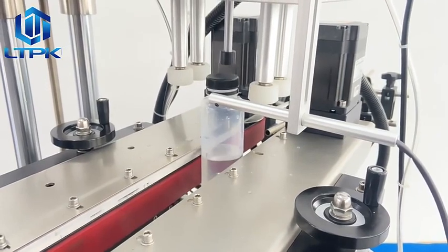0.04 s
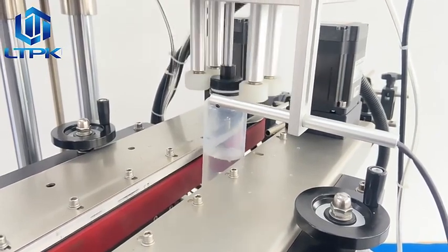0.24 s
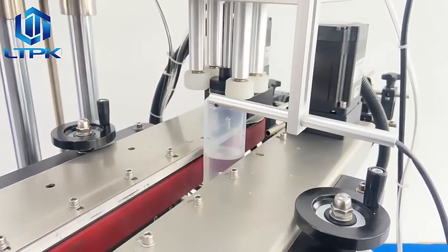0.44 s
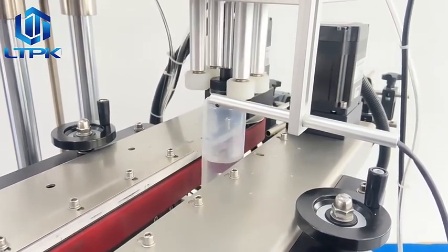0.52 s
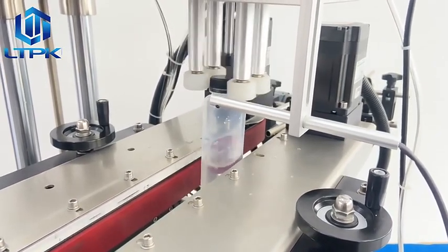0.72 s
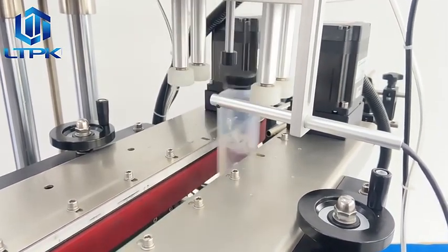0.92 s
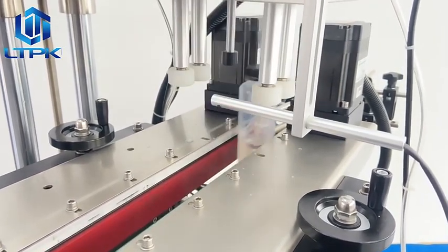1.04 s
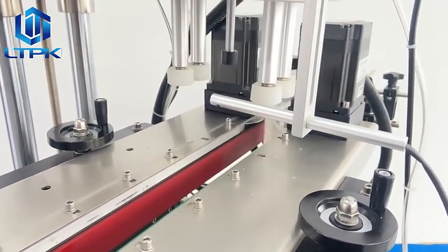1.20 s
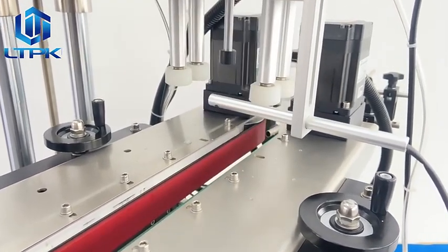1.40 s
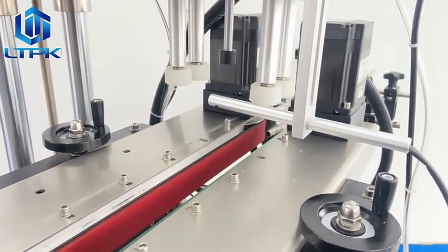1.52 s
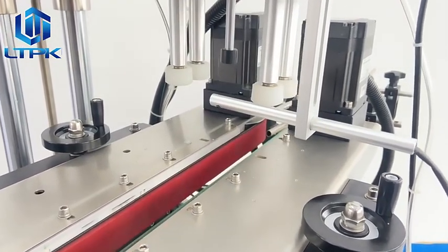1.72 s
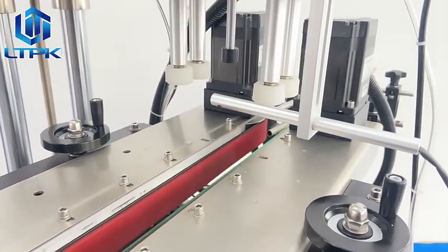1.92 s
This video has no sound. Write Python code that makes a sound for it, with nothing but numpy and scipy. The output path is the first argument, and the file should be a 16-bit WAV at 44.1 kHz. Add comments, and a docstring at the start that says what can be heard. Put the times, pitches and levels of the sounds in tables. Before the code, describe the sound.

A bottle capping machine, heard close in stereo in an echoing factory hall. Low rumble and motor hum; at 0.08 s a valve snaps, then heavy steel clanks, air hiss and frame shudder until 0.35. Spindles whir and rattle around 2.6 kHz until about 0.7. Sharp air puffs and clacks at 0.7-0.9, ringing away by 1.15. Then echo, hum, rumble and dull far knocks at 1.27-1.82, mostly left.

```python
"""Hall rumble and a steady motor hum, the rumble quieter until the machine starts. A capping head drops on
a bottle: a valve snaps, frame shudders, air puffs, metal clanks, spindles rattle and whir. Then the hall is
left: echo tail, hum, rumble and far knocks. Air, rumble and echo are shaped noise; clanks and knocks are
struck modes; spindles are filtered clicks plus a whine; frame and hum are sines."""
import sys
import numpy as np
from scipy import signal
from scipy.fft import rfft, irfft, next_fast_len
from scipy.io import wavfile
from scipy.ndimage import uniform_filter1d

SR = 44100
rng = np.random.default_rng(int(sys.argv[2]) if len(sys.argv) > 2 else 0)


def convert_level_to_amplitude(level_db):
    """Map a level in decibels to its linear amplitude factor."""
    exponent = np.asarray(level_db, float) / 20
    return 10 ** exponent


def unload_wav(signal):
    """Save mono or channel-first audio to the path in sys.argv[1] as 16-bit WAV at rate SR, clipped to [-1, 1]."""
    wavfile.write(
        sys.argv[1],
        SR,
        np.round(np.clip(np.atleast_2d(signal).T, -1, 1) * 32767).astype(np.int16),
    )


N = 85995
T = np.arange(N) / SR
PAD = next_fast_len(2 * N)
HZ = np.maximum(np.arange(PAD // 2 + 1) * SR / PAD, 1)


def over_hz(table):
    """Reads an (f/Hz, value) table at every frequency, linear in log f."""
    table = np.array(table, float)
    return np.interp(np.log(HZ), np.log(table[:, 0]), table[:, 1])


def curve(table, col=1, off_db=-120):
    """Gain over time from a dB column, off_db outside."""
    table = np.array(table, float)
    return convert_level_to_amplitude(np.interp(T, table[:, 0], table[:, col], off_db, off_db))


def shape(x, gain):
    """Filters by a gain per frequency."""
    return irfft(rfft(x, PAD) * gain, PAD)[..., :N]


def unit(x):
    """Scales to rms 1."""
    return x / np.sqrt(np.mean(x ** 2))


def band(x, lo_hz, hi_hz):
    """Scales so that one band has rms 1."""
    inside = shape(x, (HZ > lo_hz) & (HZ < hi_hz))
    return x / np.sqrt(np.mean(inside ** 2))


def peak(hz, width_hz):
    """Complex response of one resonance."""
    return 1 / (1 + 1j * (HZ ** 2 - hz ** 2) / (HZ * width_hz))


def walk(rate_hz):
    """Slow random signal, rms 1: noise averaged twice over 1 / rate_hz."""
    k = int(SR / rate_hz)
    return unit(uniform_filter1d(uniform_filter1d(rng.standard_normal(N), k), k))


def add(out, at_s, x):
    """Mixes x in at a time."""
    i = int(at_s * SR)
    out[..., i:i + x.shape[-1]] += x[..., :N - i]


def clicks(per_s, scatter_db):
    """Random clicks of very uneven size, rms 1."""
    hits = rng.random(N) < per_s / SR
    return unit(hits * rng.standard_normal(N) * convert_level_to_amplitude(scatter_db * rng.exponential(size=N)))


def tone(hz, waver_hz=0, rate_hz=15):
    """Sine of rms 1; its pitch wavers by waver_hz rms."""
    return np.sqrt(2) * np.sin(2 * np.pi * np.cumsum(hz + waver_hz * walk(rate_hz)) / SR)


def ring(modes, contact_s, near_hz=None):
    """One blow on decaying modes, each struck a little differently: soft onset, rough level, peak 1."""
    strike_scatter_db, off_pitch_db_per_octave, roughness = 2.5, 21.5, 0.3
    m, t = np.array(modes, float), T[:8000]
    chance = rng.uniform(-1, 1, (3, len(m)))
    db = m[:, 1] + strike_scatter_db * chance[0]
    hz = m[:, 0] * (1 + 0.01 * chance[1])
    if near_hz:  # modes far from the struck part's pitch ring less
        db = db - off_pitch_db_per_octave * np.abs(np.log2(hz / near_hz))
    sines = np.sin(2 * np.pi * hz[:, None] * t + np.pi * chance[2][:, None])
    decay = convert_level_to_amplitude(-60 * t / m[:, 2:])
    x = (1 - np.exp(-t / contact_s)) * (convert_level_to_amplitude(db) @ (sines * decay))
    x = x * (1 + roughness * unit(uniform_filter1d(rng.standard_normal(len(t)), size=120)))
    return x / np.abs(x).max()


# width of diffuse sound: f/Hz, side gain/dB
DIFFUSE_WIDTH = [(30, -40), (110, -13.5), (200, -11), (350, -4.5), (640, 1), (1150, 2), (2080, 4),
                 (3770, -2.5), (6800, 0.5), (12300, -19)]


def spread(mid, side):
    """Diffuse left and right from two unrelated signals, width depending on pitch."""
    side = shape(side, convert_level_to_amplitude(over_hz(DIFFUSE_WIDTH)))
    return np.array([mid + side, mid - side])


# rumble spectrum: f/Hz, relative density/dB
HALL_COLOUR = [(18, -56), (30, -30), (59, 4), (209, -6), (306, -13.5), (347, -6.5), (404, -10),
               (722, -18.5), (1360, -20), (2250, -24.5), (2800, -24), (3200, -30.5), (5000, -37.5),
               (7740, -39), (11300, -46), (13000, -50)]
# motor hum: f/Hz, rms level/dB
MOTOR_HUM = [(70.0, -43), (209.9, -56.5), (279.9, -53)]


def hall():
    """Rumble: half-octave noise bands that flicker alone; motor hum: sines of wandering level."""
    rumble_db, start_db, start_treble_db_per_decade = -34.5, -3.5, -4.5
    bass_flicker_db, treble_flicker_db = 3.4, 1.2
    before = np.interp(T, [.075, .1], [1, 0])  # quieter until the machine starts
    rumble = np.zeros((2, N))
    for hz in 32 * 2 ** np.arange(0, 8.8, .5):
        own = np.abs(np.cos(np.pi * np.clip(np.log2(HZ / hz), -.5, .5)))
        noise = shape(rng.standard_normal((2, N)), own * convert_level_to_amplitude(over_hz(HALL_COLOUR)))
        quiet_db = before * (start_db + start_treble_db_per_decade * max(np.log10(hz / 500), 0))
        flicker_db = bass_flicker_db if hz < 400 else treble_flicker_db
        rumble += noise * convert_level_to_amplitude(flicker_db * walk(13.0) + quiet_db)
    rumble = rumble / np.sqrt(np.mean(rumble[0] ** 2)) * convert_level_to_amplitude(rumble_db)
    hum = sum(convert_level_to_amplitude(db + 0.58 * walk(8.0)) * np.sqrt(2) * np.sin(2 * np.pi * hz * T) for hz, db in MOTOR_HUM)
    return spread(*rumble) + hum


# frame shudder: t/s, f/Hz, level/dB
FRAME_SHUDDER = [(0.08, 92.8, -86), (0.11, 88, -20), (0.158, 84.5, -51), (0.19, 89.8, -24.5),
                 (0.218, 92.8, -33), (0.296, 90.2, -14.5), (0.404, 89.74, -36), (0.454, 89.2, -25),
                 (0.602, 90.6, -37.5), (0.672, 83.6, -57), (0.7, 80.2, -20.5), (0.752, 82.2, -35.5),
                 (0.784, 79, -25), (0.822, 82.8, -49), (0.858, 81.5, -15), (0.902, 83.3, -20),
                 (0.934, 79.7, -17), (0.962, 72.2, -35), (1.008, 71.4, -46), (1.032, 69.3, -46),
                 (1.088, 68.6, -22), (1.136, 64.7, -28.5), (1.186, 68.8, -37.5), (1.282, 70.4, -35.5),
                 (1.336, 70.7, -43), (1.44, 72.4, -34.5), (1.5, 73.2, -35)]
# lowest sway and a panel of the frame: t/s, sway level/dB, panel level/dB
FRAME_SWAY = [(0.05, -60, -76), (0.122, -26.5, -32), (0.188, -43, -38), (0.372, -27.5, -37.5),
              (0.498, -44, -51), (0.572, -39, -65), (0.606, -43, -46), (0.654, -47, -40), (0.706, -23, -36),
              (0.778, -37, -45.5), (0.882, -32.5, -28.5), (0.948, -22.5, -60), (0.99, -29.5, -33),
              (1.098, -29, -39), (1.6, -72, -47)]


def frame():
    """Three low modes of the frame: a gliding shudder, a wavering sway below it and a panel above."""
    s = np.array(FRAME_SHUDDER)
    shudder = tone(np.interp(T, s[:, 0], s[:, 1])) * curve(FRAME_SHUDDER, col=2)
    sway = tone(48, waver_hz=6.16) * curve(FRAME_SWAY)
    panel = tone(135, waver_hz=2.74) * curve(FRAME_SWAY, col=2)
    return shudder + sway + panel


# compressed air through the cylinders: t/s, level before trim/dB
AIR_PUFFS = [(.076, -48), (.082, -41), (.135, -22.5), (.16, -29.5), (.2, -25), (.26, -22.5), (.34, -31),
             (.45, -40.5), (.6, -40), (.72, -32.5), (.732, -26.5), (.746, -15), (.766, -35), (.79, -28.5),
             (.816, -35.5), (.826, -18), (.845, -25), (.864, -27.5), (.872, -17.5), (.888, -34.5),
             (.9, -48), (.985, -51), (1.01, -41.5), (1.03, -49), (1.15, -51.5), (1.3, -89)]
# hiss spectrum: f/Hz, relative density/dB
AIR_COLOUR = [(150, -41), (300, -12), (637, -2.5), (1270, -1.5), (2500, -4.5), (3500, -5.5), (5080, -8.5),
              (5600, -11.5), (7190, -6.5), (9000, -11), (11100, -9.5), (13000, -12)]
# ringing small parts: f/Hz
TICK_HZ = (2586, 3240, 3690, 4140, 4660, 4880, 3540, 4500)


def air():
    """Turbulent hiss with the crackle of sliding seals and the ringing ticks of loose small parts."""
    crackle_per_s, crackle_db, trim_db = 980, -13, -7
    ticks_per_s, tick_width_hz, tick_db = 130, 170, -2
    scrape_from_s, scrape_to_s, scrape_db = 0.14, 0.37, 7
    run_down_from_s, run_down_tick_db = 0.92, 11
    hiss = rng.standard_normal(N) * convert_level_to_amplitude(2.7 * walk(180))
    hiss = hiss + convert_level_to_amplitude(crackle_db) * shape(clicks(crackle_per_s, 2.1), peak(3700, 6800))
    hiss = band(shape(hiss, convert_level_to_amplitude(over_hz(AIR_COLOUR))), 3000, 5500)
    ticks = sum(shape(clicks(ticks_per_s, 0.71), peak(hz, tick_width_hz)) for hz in TICK_HZ)
    # louder while the clamps slide in, and as the air runs out
    scrape = (T > scrape_from_s) & (T < scrape_to_s)
    tick_gain = convert_level_to_amplitude(tick_db + scrape_db * scrape + run_down_tick_db * (T > run_down_from_s))
    return (hiss + tick_gain * band(ticks, 3000, 5500)) * curve(AIR_PUFFS) * convert_level_to_amplitude(trim_db)


# clanks of the head: t/s, ring peak level/dB, ring f/Hz, thud re ring/dB, thud f/Hz, crack re ring/dB
HEAD_CLANKS = [(0.0802, -23.5, 2740, -11, 700, -27), (0.1072, -18, 2600, -11, 526, -21),
               (0.1391, -10, 2030, 0, 580, 5), (0.18, -12, 2620, -20, 387, -32),
               (0.2318, -4, 2340, -15, 298, -0.5), (0.243, -14, 4340, -9.5, 310, -9),
               (0.2634, -8.5, 2340, -14.5, 318, -13), (0.3259, -17.5, 2560, -5.5, 280, 4),
               (0.5776, -18, 2620, -14, 500, -12), (0.6488, -15.5, 2555, -44, 530, -3.5),
               (0.6985, -17.5, 2360, -10, 334, -1.5), (0.7312, -22, 6280, 2, 520, 15.5),
               (0.7435, -11, 4230, -16, 415, -2), (0.7527, -21, 2400, 0.5, 280, -25),
               (0.7908, -22.5, 6130, -5, 290, -27), (0.824, -12, 4250, -5.5, 800, 1),
               (0.836, -14.5, 3300, -2, 340, -17), (0.8688, -13.5, 5900, -19.5, 262, 6.5),
               (0.8725, -13, 3200, -26, 342, -16), (0.8842, -18, 2385, 0, 284, 14),
               (1.124, -30, 3250, -16, 288, -27), (1.1472, -34, 3200, -10, 286, -24)]
# steel modes: f/Hz, level/dB, t60/s
STEEL_MODES = [(1045, -9, 0.093), (1484, -0.5, 0.027), (2030, -5.5, 0.032), (2340, -8, 0.048),
               (2620, -9, 0.042), (3580, -6.5, 0.02), (3984, -0.5, 0.0094), (4340, 0, 0.029),
               (5240, -6, 0.071), (6130, 5, 0.017), (7740, -21, 0.015)]
# table top modes: f/Hz, level/dB, t60/s
TABLE_TOP_MODES = [(194.3, 4, 0.13), (280, -1, 0.14), (333, 2, 0.12), (489, 0.5, 0.048), (619.4, 5, 0.066),
                   (777, -3, 0.034), (820, 0.5, 0.078)]


def clanks():
    """Steel modes ring with a noise crack; the table top thuds just after."""
    crack_t60_s, thud_lag_s = 0.02, 0.00187
    out, t = np.zeros(N), T[:8000]
    for at_s, db, hz, thud_db, thud_hz, crack_db in HEAD_CLANKS:
        crack = rng.standard_normal(len(t)) * convert_level_to_amplitude(-60 * t / crack_t60_s) * (1 - np.exp(-t / 0.001))
        add(out, at_s, convert_level_to_amplitude(db) * (ring(STEEL_MODES, 0.00025, hz) + convert_level_to_amplitude(crack_db) * crack))
        add(out, at_s + thud_lag_s, convert_level_to_amplitude(db + thud_db) * ring(TABLE_TOP_MODES, 0.0017, thud_hz))
    return out


# spindle drive: t/s, level/dB
SPINDLE_DRIVE = [(.09, -41), (.11, -42), (.17, -28), (.185, -37), (.21, -27.5), (.28, -32), (.33, -27),
                 (.45, -32), (.596, -31.5), (.7, -32), (.712, -32), (.73, -45), (.8, -34.5), (.95, -49)]
# ringing of the spindle housings: f/Hz, width/Hz, level/dB
HOUSING_MODES = [(2420, 140, 3), (2606, 290, 2.5), (4080, 180, -15), (5920, 68, -2.5)]
# broad rattle spectrum: f/Hz, relative density/dB
RATTLE_COLOUR = [(88, -36), (150, -27), (500, -17), (920, -12.5), (1090, -15.5), (2150, -9.5), (2640, -9),
                 (2950, -14.5), (4600, -23), (5400, -36), (6420, -10.5), (8000, -25.5), (10800, -29),
                 (13000, -59)]


def spindles():
    """Uneven tooth clicks, throbbing with the shaft, ring the housings and rattle broadly under a whine."""
    teeth_per_s, tooth_scatter_db, shaft_hz, shaft_db = 1500, 3.57, 25.92, -2.5
    rattle_db, whine_hz, whine_waver_hz, whine_db = 4.5, 2616, 30, -5.5
    teeth = clicks(teeth_per_s, tooth_scatter_db) + 0.58 * rng.standard_normal(N)
    teeth = teeth * convert_level_to_amplitude(shaft_db * np.sin(2 * np.pi * shaft_hz * T))
    housing = shape(teeth, sum(convert_level_to_amplitude(db) * peak(hz, width_hz) ** 2 for hz, width_hz, db in HOUSING_MODES))
    rattle = shape(teeth, convert_level_to_amplitude(over_hz(RATTLE_COLOUR)))
    whine = convert_level_to_amplitude(whine_db + 3 * walk(30)) * tone(whine_hz, whine_waver_hz, 60.6)
    mix = whine + unit(housing) + convert_level_to_amplitude(rattle_db) * unit(rattle)
    return band(mix, 2200, 2800) * curve(SPINDLE_DRIVE)


# lag between the microphone ports: f/Hz, left lead/rad
PORT_PHASE = [(100, 0.5), (500, 1.17), (1030, 1.07), (1500, 3.5), (2300, 1.18), (3500, 1.07), (5000, 1.5),
              (7000, 1.3), (9000, 0.16), (12000, 1.5)]
# balance of the ports: f/Hz, left minus right/dB
PORT_BALANCE = [(60, -5), (110, -17), (200, 2), (350, -2), (640, -1), (1150, 9), (2080, 2), (3770, 5),
                (6800, 1), (12300, -2)]


def ports(machine):
    """The machine reaches two microphone ports with a lag and a balance that depend on pitch."""
    side = np.array([[.5], [-.5]])
    return shape(machine, np.exp(1j * side * over_hz(PORT_PHASE)) * convert_level_to_amplitude(side * over_hz(PORT_BALANCE)))


# hall decay: f/Hz, t60/s
ECHO_T60 = [(100, 2.2), (500, 3.3), (2000, 1.38), (5000, 0.86), (12000, 0.085)]


def echo(x):
    """Convolves with decaying noise: close reflections off the machine and the long tail of the hall."""
    tail_db, early_db, early_t60_s, tail_rise_s = -14, -8.5, 0.13, 0.017
    decay = np.array(ECHO_T60, float)
    tail = 0
    for hz in 60 * 2 ** np.arange(8):
        t60_s = np.interp(np.log(hz), np.log(decay[:, 0]), decay[:, 1])
        noise = shape(rng.standard_normal((2, N)), peak(hz, hz) ** 2)
        tail = tail + noise * convert_level_to_amplitude(-60 * T / t60_s) * np.minimum(T / tail_rise_s, 1)
    early = rng.standard_normal((2, N)) * convert_level_to_amplitude(-60 * T / early_t60_s)
    response = sum(convert_level_to_amplitude(db) * r / np.sqrt(np.sum(r[0] ** 2)) for r, db in ((tail, tail_db), (early, early_db)))
    return spread(*(shape(x, rfft(r, PAD)) for r in response))


# far knocks in the hall: t/s, level/dB, rattle re ring/dB, left minus right/dB, f/Hz
FAR_KNOCKS = [(1.273, -28, -12, 15, 800), (1.299, -36, -16, 15, 800), (1.400, -21.5, -10.5, 6.5, 790),
              (1.622, -29, -7, 12, 755), (1.644, -34, -24, 3, 800), (1.732, -24.5, -17.5, 14, 710),
              (1.749, -30.5, -24, 15, 610), (1.822, -28, -12, 15.5, 760)]
# hollow body modes: f/Hz, level/dB, t60/s
KNOCK_BODY = [(619, 3, 0.073), (700, -3, 0.063), (751, -2.5, 0.094), (843, -2, 0.076), (908, -4, 0.083),
              (1106, 2, 0.059)]
# rattling parts: f/Hz, width/Hz, level/dB
KNOCK_PARTS = [(800, 500, 9.5), (1437, 420, 6.5), (1910, 430, 5.5), (2520, 470, 2.5)]


def knocks():
    """Dull far blows: a hollow body rings near its pitch and loose parts rattle raggedly after it."""
    rattle_per_s, rattle_rise_s, rattle_t60_s = 1300, 0.0013, 0.13
    out, t = np.zeros((2, N)), T[:8000]
    parts = sum((-1) ** k * convert_level_to_amplitude(db) * peak(hz, width_hz) ** 2
                for k, (hz, width_hz, db) in enumerate(KNOCK_PARTS))
    loose = unit(shape(clicks(rattle_per_s, 0.94), parts))
    swell = (1 - np.exp(-t / rattle_rise_s)) * convert_level_to_amplitude(-60 * t / rattle_t60_s)
    for at_s, db, rattle_db, pan_db, hz in FAR_KNOCKS:
        start = rng.integers(N - len(t))
        x = ring(KNOCK_BODY, 0.00055, hz) + convert_level_to_amplitude(rattle_db) * swell * loose[start:start + len(t)]
        add(out, at_s - .001, convert_level_to_amplitude(db + np.array([[pan_db], [-pan_db]]) / 2) * x)
    return out


def scene():
    """Machine at the ports, a second air signal in opposite phase for width, frame, knocks, echo and hall."""
    machine, far = spindles() + air() + clanks(), knocks()
    wide_air = convert_level_to_amplitude(-3) * np.array([[.5], [-.5]]) * air()
    return ports(machine) + wide_air + frame() + far + echo(machine + far.mean(axis=0)) + hall()


def low_pass(x):
    """Removes everything above the highest recorded frequency."""
    return signal.sosfilt(signal.butter(12, 12890, fs=SR, output="sos"), x)


# treble of the channel sum: f/Hz, gain/dB
SUM_TREBLE = [(7700, -0.5), (8300, -11.5), (9500, -19.5), (9900, -3.5), (11500, -2.5), (11900, -24),
              (12400, -60)]
# treble of the channel difference: f/Hz, gain/dB
DIFFERENCE_TREBLE = [(5000, -4.5), (7500, -9), (8400, 5.5), (9500, 14.5), (10200, -11), (10600, -29),
                     (11600, -12), (11900, -45), (12400, -83)]


def record(dry):
    """Shapes the treble of channel sum and difference apart: near 9 kHz the difference is favoured."""
    mid = shape((dry[0] + dry[1]) / 2, convert_level_to_amplitude(over_hz(SUM_TREBLE)))
    side = shape((dry[0] - dry[1]) / 2, convert_level_to_amplitude(over_hz(DIFFERENCE_TREBLE)))
    mix = np.array([mid + side, mid - side])
    return low_pass(mix)


dry = scene()
out = record(dry)
unload_wav(out)
```